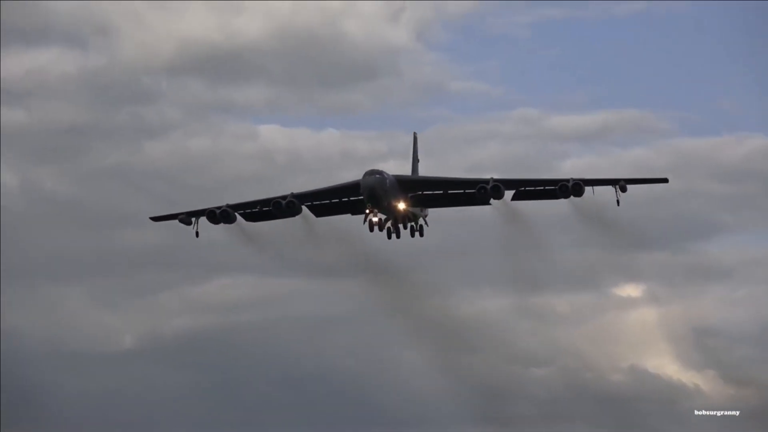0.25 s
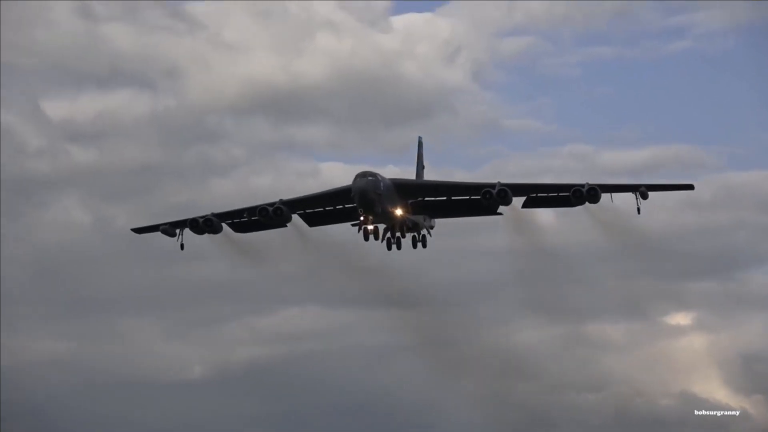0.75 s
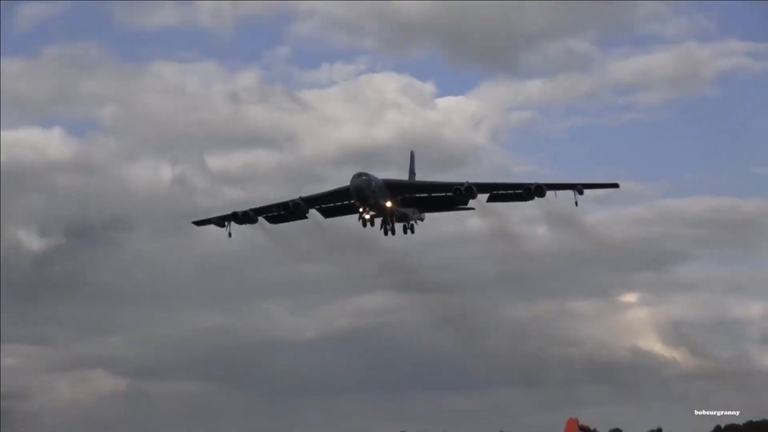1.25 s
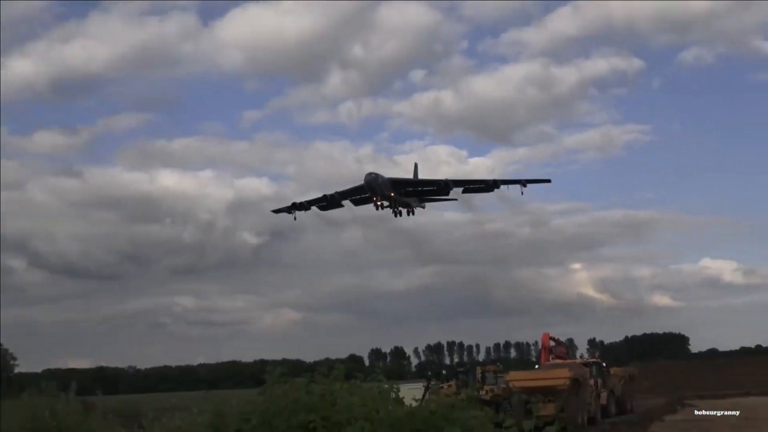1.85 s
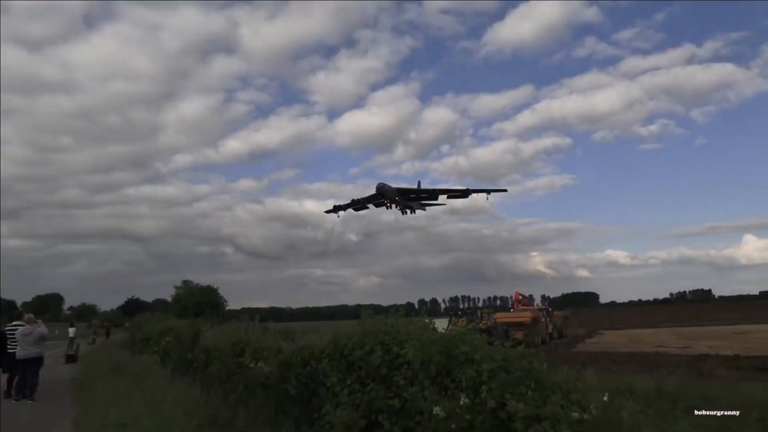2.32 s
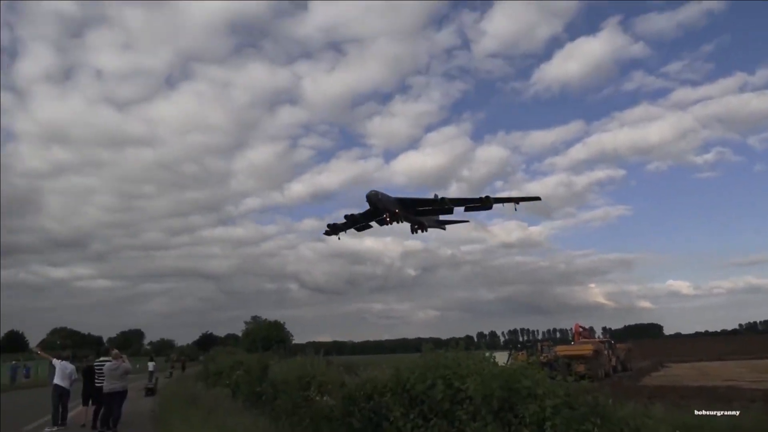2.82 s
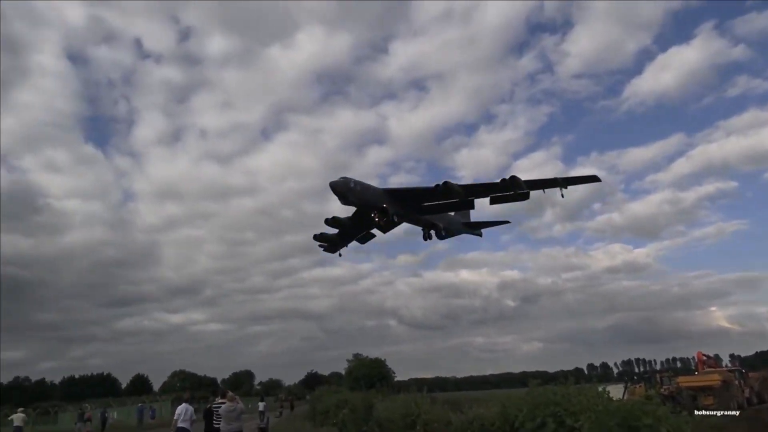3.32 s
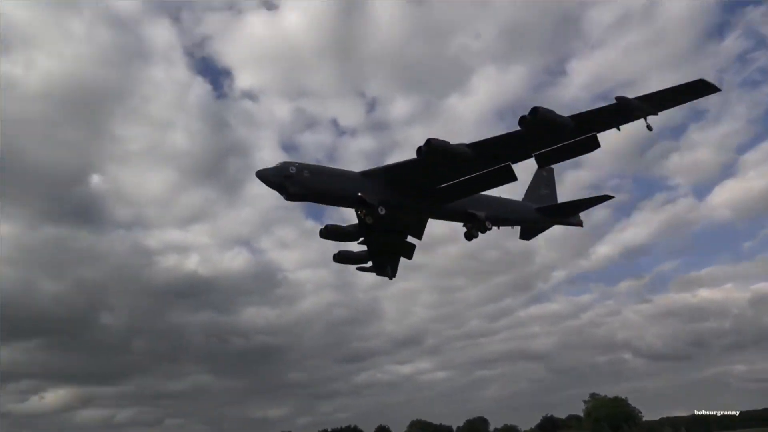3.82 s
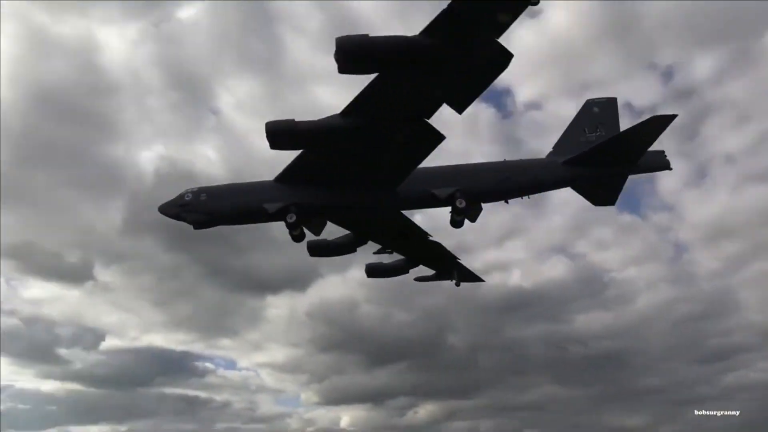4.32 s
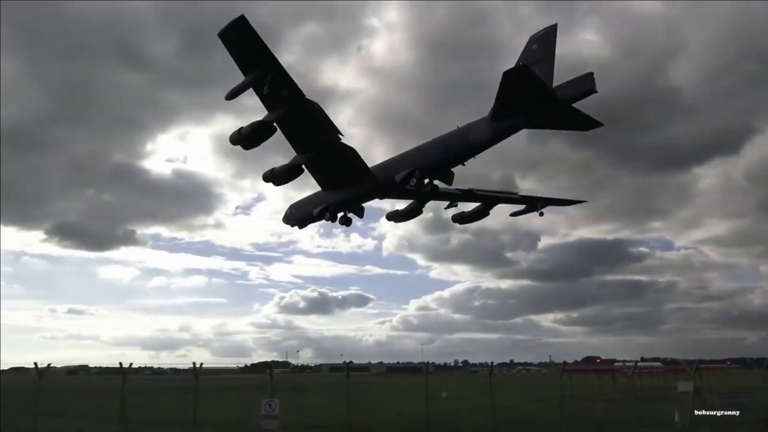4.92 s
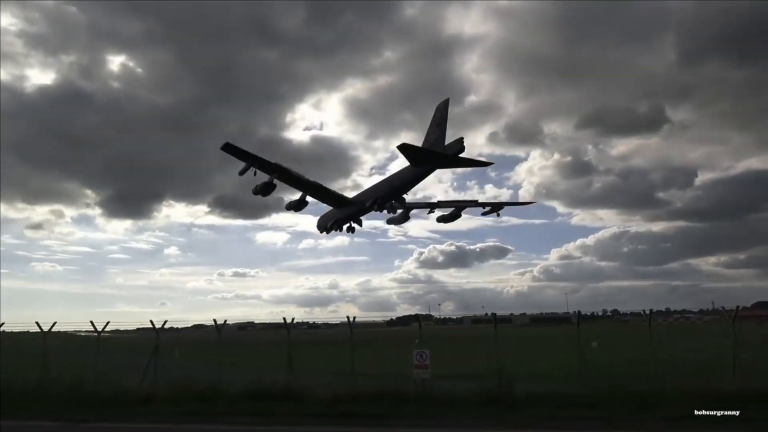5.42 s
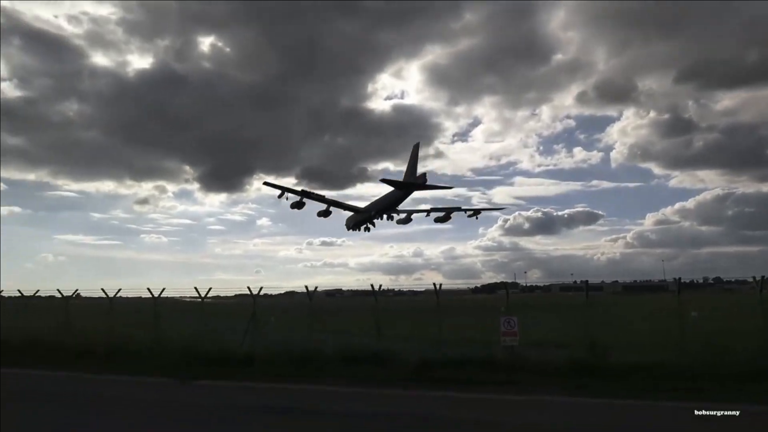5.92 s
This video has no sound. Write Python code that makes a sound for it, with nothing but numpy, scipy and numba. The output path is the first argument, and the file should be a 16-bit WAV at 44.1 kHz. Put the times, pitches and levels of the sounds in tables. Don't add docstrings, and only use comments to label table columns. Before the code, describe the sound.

A large multi-engine jet on approach whines shrilly over roar and hiss, sweeping down in pitch as it passes low overhead and recedes.

```python
import sys
import numpy as np
from scipy import signal
from scipy.io import wavfile
from scipy.ndimage import uniform_filter1d, minimum_filter1d
from numba import njit

SR = 44100
rng = np.random.default_rng(int(sys.argv[2]) if len(sys.argv) > 2 else 0)


def output_pcm(signal):
    pcm = np.clip(np.atleast_2d(signal).T, -1, 1) * 32767
    wavfile.write(sys.argv[1], SR, np.round(pcm).astype(np.int16))


def gain_from_db(level_db):
    decades = np.asarray(level_db, float) / 20
    return 10 ** decades


N = 271656
STEP = 64
SPEED_M_S, SOUND_M_S = 105.8, 343

# blade tone at rest [f/Hz], creep [Hz/s], heard abreast [t/s], nearest distance [m]
ENGINES = [
    (1691.4, 14.2, 4.759, 82.5),
    (1913.1, -16.99, 5.27, 123.8),
    (1949.8, 8.68, 4.711, 89.5),
    (2052.0, -24.23, 5.095, 112.9),
    (2029.6, 9.27, 4.716, 84.5),
    (2116.0, -24.63, 5.249, 116.7),
    (2138.4, -22.33, 5.211, 116.6),
]
WING = [0, 1, 0, 1, 0, 1, 1]
# [t/s], noise gain [level/dB], common whine level [level/dB], left minus right [level/dB]
PASS = [(0.0, 3.5, -20, -2.3), (0.6, 1.5, -23.5, -2.1), (1.2, -1.5, -21, -2.5), (1.8, -4, -25, -3.5),
        (2.4, -6.5, -24, -4), (3.0, -5.5, -26.5, -5), (3.5, -10.5, -25, -5.5), (3.9, -11.5, -28.5, -6.5),
        (4.2, -12, -28, -6.5), (4.5, -11.5, -34, -6), (4.8, -11, -30.5, -4.5), (5.1, -10.5, -31, -4),
        (5.3, -11.5, -32, -3), (5.5, -14.5, -40, -4.5), (5.8, -16.5, -40.5, -3.5), (6.16, -18, -41.5, -3.5)]
# [t/s], times calm air [ratio]
WAKE = [
    (0, 1),
    (3.6, 1),
    (4.3, 1.8),
    (5.2, 2.4),
    (6.16, 3.2),
]


def curves(table, t):
    s, *columns = np.transpose(table)
    return np.array([np.interp(t, s, c) for c in columns])


def on_log(points, hz):
    f, v = np.transpose(points)
    return np.interp(np.log(hz), np.log(f), v)


def bump(t, at_s, half_s):
    return np.exp(-((t - at_s) / half_s) ** 2)


def dips(events, t):
    return sum(db * bump(t, s, half_s) for s, db, half_s in events)


def walk(rate_hz, count):
    hold = max(int(SR / STEP / rate_hz), 1)
    levels = rng.standard_normal((count, N // STEP // hold + 2))
    steps = np.repeat(levels, hold, axis=1)
    smooth = uniform_filter1d(uniform_filter1d(steps, hold), hold)
    return 1.29 * smooth[:, :N // STEP + 2]


def flight(t, engine):
    _, _, abreast_s, miss_m = ENGINES[engine]
    sent_s = t - abreast_s
    for _ in range(14):
        sent_s = t - abreast_s - (np.hypot(miss_m, SPEED_M_S * sent_s) - miss_m) / SOUND_M_S
    far_m = np.hypot(miss_m, SPEED_M_S * sent_s)
    return far_m, -SPEED_M_S * sent_s / far_m


def pitch(t):
    # [t/s], near wing speed-up [%], far wing speed-up [%]
    throttle = [(0.0, -0.44, -1.48), (0.8, -0.55, -0.34), (1.6, -0.43, 0.9), (2.2, -0.53, 1.5),
                (2.8, -0.31, 2.05), (3.3, 0.25, 2.45), (3.7, 1.12, 1.55), (4.0, 1.42, 0.25),
                (4.3, 0.66, -1.3), (4.6, 0.62, -2.28), (4.9, 0.48, -2.73), (5.2, 0.36, -2.52),
                (5.6, -1.14, -0.51), (6.16, -3.7, 0.59)]
    spool = 1 + curves(throttle, t) / 100
    heard_hz = []
    for k, (rest_hz, creep_hz_s, _, _) in enumerate(ENGINES):
        _, ahead = flight(t, engine=k)
        doppler = 1 / (1 - SPEED_M_S * ahead / SOUND_M_S)
        heard_hz.append((rest_hz + creep_hz_s * t) * spool[WING[k]] * doppler)
    return np.array(heard_hz)


def fades(t):
    # [t/s], change [level/dB], half length [s]
    near_events = [
        [(0.64, -5.5, 0.06), (3.0, 3.5, 0.6), (3.76, 6, 0.078), (4.2, 9, 0.038), (4.4, -3, 0.13),
         (4.56, -1, 0.19), (5.0, 2, 0.05), (5.16, -14, 0.15), (5.2, -5, 0.21), (5.58, 9.5, 0.08),
         (5.96, -12, 0.11)],
        [(0.16, -7, 0.083), (1.6, 4, 0.4), (2.0, 5, 0.054), (2.24, 6.5, 0.045), (2.68, -15, 0.1),
         (3.24, 6.5, 0.055), (3.6, 3, 0.06), (4.16, -7, 0.052), (4.56, -10, 0.25), (4.76, -13, 0.06),
         (5.44, 0, 0.11)],
        [(0.16, 1, 0.046), (1.52, 4, 0.19), (2.8, 6.5, 0.06), (3.04, 2.5, 0.038), (3.32, -2, 0.27),
         (3.8, -9, 0.067), (4.04, 8, 0.066), (4.48, 10, 0.067)],
    ]
    # [t/s], change [level/dB], half length [s]
    far_events = [
        [(0.36, 3.5, 0.06), (0.68, 5, 0.29), (1.2, -8, 0.1), (1.64, -11, 0.1), (2.24, -4.5, 0.28),
         (2.36, -10, 0.09), (2.88, 4.5, 0.55), (4.04, -12, 0.21), (4.8, 4.5, 0.067), (5.28, 13.5, 0.43)],
        [(0.16, 2.5, 0.06), (0.92, 9, 0.039), (1.52, 4.5, 0.042), (2.32, -13, 0.038), (3.4, -5, 0.46),
         (4.2, -5, 0.27), (4.56, 2, 0.1), (5.0, 3, 0.13), (5.32, 5.5, 0.083)],
    ]
    # [t/s], change [level/dB], half length [s]
    more_far_events = [
        [(1.04, -0.5, 0.16), (1.52, -15, 0.23), (2.12, 2.5, 0.086), (2.48, 1.5, 0.042), (3.04, -11, 0.33),
         (3.52, 1, 0.091), (3.8, -2.5, 0.035), (4.08, 10, 0.25), (5.2, -14, 0.027)],
        [(0.64, 3.5, 0.33), (1.04, -21, 0.06), (1.48, -12.5, 0.2), (2.56, 4, 0.084), (3.16, 6.5, 0.037),
         (3.56, -13, 0.078), (4.12, 5, 0.27), (5.2, -13, 0.041)],
    ]
    near, far = iter(near_events), iter(far_events + more_far_events)
    return np.array([dips(next(far if wing else near), t) for wing in WING])


@njit
def sines(angle, size, step):
    out = np.zeros(angle.shape[1] * step)
    for k in range(len(angle)):
        for j in range(angle.shape[1] - 1):
            z = np.exp(1j * angle[k, j])
            turn = np.exp(1j * (angle[k, j + 1] - angle[k, j]) / step)
            for i in range(step):
                out[j * step + i] += (size[k, j] + i / step * (size[k, j + 1] - size[k, j])) * z.imag
                z *= turn
    return out


def twinkle(phase, db, twinkle_db, wobble_rad):
    quick, slow = walk(26, count=2 * len(phase)), walk(8, count=len(phase))
    size = np.sqrt(2) * gain_from_db(db + twinkle_db * (quick[::2] + 0.42 * slow))
    start = 2 * np.pi * rng.random((len(phase), 1))
    return sines(phase + wobble_rad * quick[1::2] + start, size, STEP)[:N]


def fan_tones(t, phase):
    # offset [level/dB], tilt [dB/s]
    voices = [(-1.15, 1), (-2.5, -1), (-1, -1.4), (0, -0.53), (2.5, 0.76), (-3.4, -1.4), (-0.8, 1.2)]
    engine_pan_db = [.3, -.3, .2, -.2, .1, -.1, .3]
    wake, fade_db = curves(WAKE, t)[0], fades(t)
    out = 0
    for k, (offset_db, tilt_db_s) in enumerate(voices):
        db = curves(PASS, t)[1] + offset_db + tilt_db_s * (t - t.mean()) + fade_db[k]
        tone = twinkle(phase[k:k + 1], db, 1.72 * wake, 0.56 * wake)
        out = out + gain_from_db(np.array([[.5], [-.5]]) * engine_pan_db[k]) * tone
    return out


def steepened_tones(t, phase):
    neighbours = [(0, 4), (2, 4), (1, 6), (3, 5)]
    # peak [level/dB], [t/s], rise [dB/s], fall [dB/s]
    beams = [(-36, 3.6, 10, 7), (-35.5, 0.44, 23, 2.6), (-29, 1.97, 7, 4.5), (-35.5, 0.9, 4.5, 2),
             (-32.5, 3.6, 0.8, 14.5), (-30.5, 4.27, 4, 1), (-34, 5.5, 3, 28), (-35, 2.85, 7.5, 3.5),
             (-32, 0.83, 14, 5), (-32, 0.79, 7.5, 7), (-43, 5.8, -0.5, 11)]
    # [t/s], change [level/dB], half length [s]
    beam_events = [
        [(2.08, -12, 0.4), (4.15, 8, 0.1), (5.0, 19.5, 0.08), (5.95, 3, 0.063)],
        [(1.32, 9, 0.08), (2.04, -1, 0.27), (4.12, -18, 0.76), (5.44, 5.5, 0.18)],
        [(2.72, -22, 0.2), (5.28, 9.5, 0.22), (5.75, 1.5, 0.1)],
        [(2.4, -4, 0.27), (4.16, -16, 0.14), (4.52, 14, 0.088)],
        [(3.52, 5, 0.12), (4.45, 6, 0.13)],
        [(0.32, 10.5, 0.17), (4.52, -12, 0.18)],
        [(2.48, 5.5, 0.32), (4.48, -24, 0.24), (5.75, 0, 0.2)],
        [(2.3, 2, 0.2)],
        [(2.08, 8.5, 0.58), (3.6, 15.5, 0.08), (4.32, -10, 0.12), (5.68, 17, 0.24)],
        [(2.96, -18.5, 0.15), (4.44, 25.5, 0.17)],
        [(1.68, -6, 0.32), (2.6, 4, 0.11), (3.24, -18, 0.22)],
    ]
    pairs = [(k, k) for k in range(len(phase))] + neighbours
    beam_db = [db - np.maximum(rise * (s - t), fall * (t - s)) for db, s, rise, fall in beams]
    second_db = np.array([db + dips(events, t) for db, events in zip(beam_db, beam_events)])

    wake = curves(WAKE, t)[0]
    far_m, ahead = flight(t, engine=4)
    behind = np.maximum(-ahead, 0)
    order_db = -4.5 - .021 * far_m - 3.5 * (1 - ahead)
    shade_db = -22 * np.maximum(-ahead - .55, 0)
    out = 0
    for order, lift_db, air_db_m in ((2, -0.26, 0.00051), (3, 0.2, -0.0007), (4, -0.5, 0.00099), (5, 14, -0.094)):
        beam, mixes = [], []
        for k, (a, b) in enumerate(pairs):
            for m in range(1, order if a != b else 2):
                beam.append(k)
                mixes.append(m * phase[a] + (order - m) * phase[b])
        db = second_db[beam] + (order - 2) * order_db + lift_db + air_db_m * far_m
        db = db + (order - 1) * shade_db
        out = out + twinkle(np.array(mixes), db, 1.78 * wake, 0.54 * order * wake * (1 + behind))
    return out


def difference_tones(t, phase):
    hums = [
        (1, .695),
        (0, .89),
    ]
    db = -45 - 30 * np.maximum(t - 2.8, 0)
    return twinkle(np.array([ratio * phase[k] for k, ratio in hums]), db, 3.8, 0.36)


def whines():
    t = np.arange(N // STEP + 2) * STEP / SR
    phase = np.cumsum(2 * np.pi * pitch(t) * STEP / SR, axis=1)
    return fan_tones(t, phase) + steepened_tones(t, phase) + difference_tones(t, phase)


def roar_and_hiss_db(hz, t):
    # centre [f/Hz], width [Hz]
    bands = [
        (120, 70),
        (320, 220),
        (650, 280),
        (1070, 250),
        (3800, 1400),
        (6900, 1300),
    ]
    # abreast [level/dB], share of distance loss [ratio], extra on approach [level/dB]
    reach = [
        (-26.5, 1.71, -1),
        (-23.5, 0.4, -0.7),
        (-21.5, 0.65, -3.5),
        (-23, 0.53, -0.14),
        (-17, 0.92, 0.4),
        (-15.5, 1.86, 3.5),
    ]
    # [f/Hz], [level/dB]
    colour = [(92, -3.5), (160, 1), (250, 3), (400, -0.5), (500, -3), (1400, -1.5), (2000, -1), (3800, 0),
              (5200, -1), (7000, -0.5), (9000, -0.5), (12000, 2), (15000, -28)]
    # [t/s], change [level/dB], half length [s]
    surges = [
        (.15, 1.5, 0.11),
        (.55, 5, 0.11),
        (1.45, 2.5, 0.14),
        (2.0, -1.5, 0.15),
        (2.85, 0, 0.04),
        (3.6, -3, 0.19),
        (4.5, 4, 0.26),
        (5.1, -3, 0.14),
        (5.55, -1, .1),
        (6.0, 1.5, .2),
    ]
    centre_hz, width_hz = np.transpose(bands)
    far_m, ahead = flight(t, engine=4)
    distance_db = 20 * np.log10(far_m.min() / far_m)
    level_db, loss_share, ahead_db = np.transpose(reach)[:, :, None]
    band_db = curves(PASS, t)[0] + level_db + loss_share * distance_db + ahead_db * ahead
    band_db = band_db - 10 * np.log10(2 * width_hz / SR)[:, None]
    db = np.hstack([on_log(np.c_[centre_hz, frame], hz) for frame in band_db.T])
    db += on_log(colour, hz)
    db += dips(surges, t) / (1 + (hz / 550) ** 4)
    dull_db_khz = -1.5 - .016 * far_m - 2.5 * np.maximum(-ahead, 0)
    db += dull_db_khz * np.maximum(hz - 7370, 0) / 1e3
    return db - 20 * np.log10(1 + (84 / hz) ** 3)


def gusts_db(hz, t):
    # [t/s], change [level/dB], half length [s]
    gusts = [(0.08, -4, 0.095), (0.24, -0.5, 0.025), (0.52, -3.5, 0.033), (0.64, 1.5, 0.05),
             (1.16, -2, 0.03), (1.44, 2, 0.032), (1.52, -1, 0.021), (1.64, 1.5, 0.03), (2.56, 1, 0.027),
             (2.64, -5.5, 0.03), (3.04, -3, 0.02), (3.44, 2.5, 0.035), (3.8, 2, 0.046), (6.04, 0, 0.06)]
    drift = walk(14, count=1)[0, np.minimum(t * SR, N).astype(int) // STEP]
    swell_db = 0.63 * drift + dips(gusts, t)
    patches = rng.standard_normal((len(hz), len(t)))
    patches = uniform_filter1d(uniform_filter1d(patches, size=24, axis=0), size=4, axis=1)
    return swell_db * np.minimum(hz / 6200, 1.5) + 1.5 * 8 * patches


def haze_db(hz, t):
    wake = curves(WAKE, t)[0] - 1
    level_db = 12 - 7 * bump(t, 3.3, .45)
    away = np.log(hz / pitch(t)[4]) - 0.034 * wake
    octave_away = away - np.log(2)
    return level_db * (np.exp(-(away / 0.073) ** 2) + 0.12 * wake * np.exp(-(octave_away / 0.073) ** 2))


def howl_db(hz, t):
    # [t/s], half length [s], height over roar [level/dB], centre [f/Hz]
    howls = [
        (.1, .4, 2.5, 1310),
        (0.786, 0.36, 7.5, 1474),
        (1.305, 0.42, 13.5, 1390),
        (2.106, 0.17, 13, 1394),
        (2.443, 0.24, 8.5, 1315),
        (3.2, 0.68, 7, 1320),
    ]
    return sum(db * bump(t, s, half_s) * np.exp(-(np.log(hz / centre_hz) / 0.067) ** 2)
               for s, half_s, db, centre_hz in howls)


def ground_echo(hz, t):
    # [t/s], lag [ms], share [0-1]
    ground = [(0, 2.15, .5), (.9, 2.1, .45), (1.4, 1.95, .7), (2.0, 2.1, .8), (2.5, 2.3, .8),
              (3.0, 2.35, .55), (3.6, 2.2, .25), (4.2, 3.6, .05), (6.16, 4.5, .05)]
    lag_ms, share = curves(ground, t)
    echo = np.clip(share, 0, .95) / (1 + (hz / 1090) ** 4)
    return np.abs(1 - echo * np.exp(-2j * np.pi * hz * lag_ms / 1e3))


def breeze(hz):
    # [f/Hz], density [dB/Hz]
    wind = [(20, -89), (45, -73), (80, -65), (150, -87), (400, -110)]
    return gain_from_db(on_log(wind, hz)) * np.sqrt(SR / 2)


def jet_noise():
    # [f/Hz], [0-1]
    likeness = [(25, 0.94), (45, 0.8), (110, 0.88), (280, 0.96), (1300, 0.97), (5000, 0.94), (9000, 0.78),
                (13000, 0.4)]
    # [f/Hz], extra left minus right [level/dB]
    capsule_lean = [(30, 6), (80, 0), (140, -1.8), (300, 2), (700, 0.9), (1400, -0.2), (4500, 2),
                    (9000, 4.5), (13000, 0)]
    frame = 1024
    hz, t, (mid, side) = signal.stft(rng.standard_normal((2, N)), SR, nperseg=frame)
    hz = np.maximum(hz, 10)[:, None]
    db = roar_and_hiss_db(hz, t) + gusts_db(hz, t) + haze_db(hz, t) + howl_db(hz, t)
    gain = np.hypot(gain_from_db(db) * ground_echo(hz, t), breeze(hz))
    like = np.clip(on_log(likeness, hz), 0, 1)
    mid = gain * mid * np.sqrt((1 + like) / 2)
    side = gain * side * np.sqrt((1 - like) / 2)
    lean = gain_from_db(on_log(capsule_lean, hz) / 2)
    left, right = (mid + side) * lean, (mid - side) / lean
    return signal.istft(np.array([left, right]), SR, nperseg=frame)[1][:, :N]


def scene():
    pan_db = curves(PASS, np.arange(N) / SR)[2]
    return (whines() + jet_noise()) * gain_from_db(np.array([pan_db, -pan_db]) / 2)


def low_pass(x):
    return signal.sosfilt(signal.butter(12, 14130, fs=SR, output="sos"), x)


def record(dry):
    peak = uniform_filter1d(-minimum_filter1d(-np.abs(dry).max(axis=0), size=200), size=200)
    held = dry * np.minimum(.66 / peak, 1) ** .8
    return low_pass(held)


dry = scene()
out = record(dry)
output_pcm(out)
```